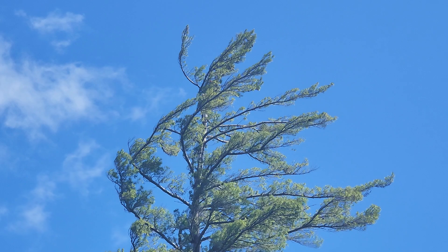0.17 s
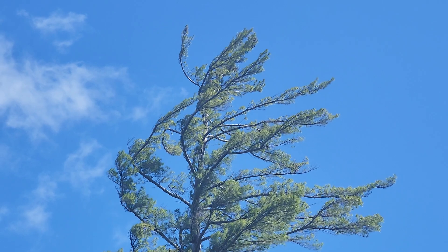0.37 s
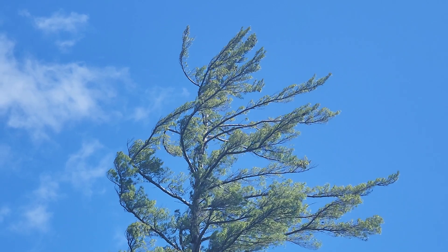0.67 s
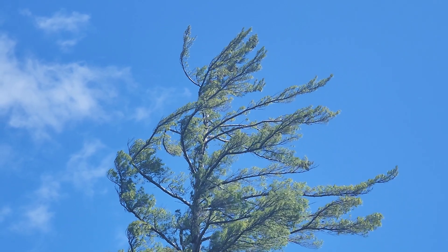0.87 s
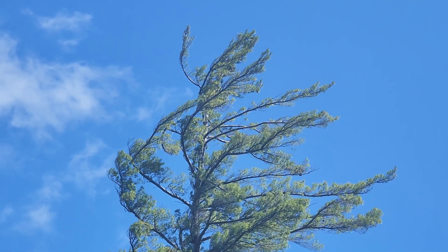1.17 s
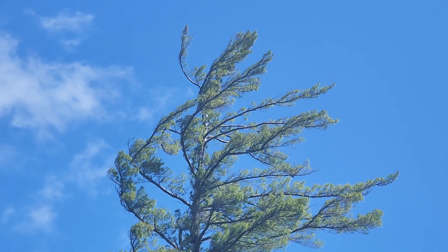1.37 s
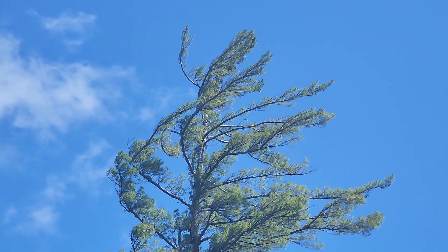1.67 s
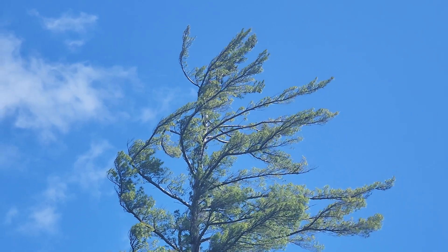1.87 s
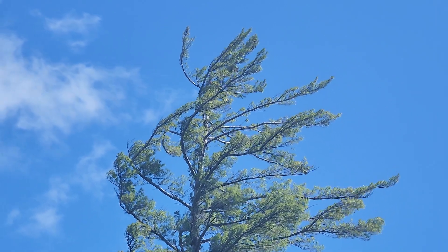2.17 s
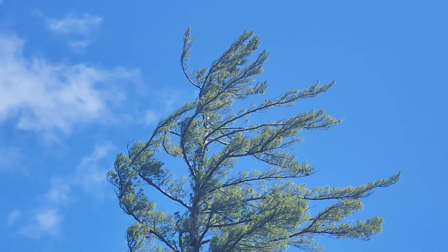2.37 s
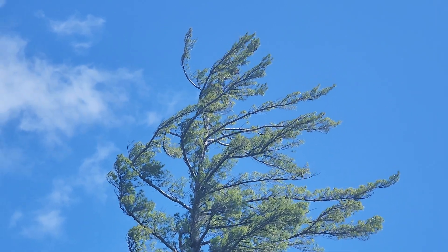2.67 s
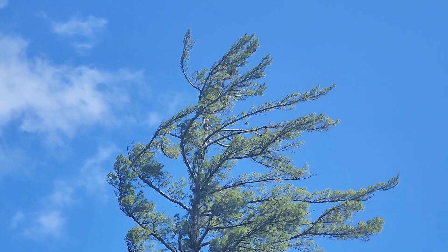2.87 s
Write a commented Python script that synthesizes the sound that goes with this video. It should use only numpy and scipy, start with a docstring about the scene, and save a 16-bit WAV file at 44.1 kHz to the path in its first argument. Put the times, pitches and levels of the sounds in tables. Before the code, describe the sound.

After a brief silence, an even, airy wind rush in pine needles starts abruptly and continues throughout; faint far-off engine drone lies beneath, and low wind buffets hit the handheld microphone late in the middle.

```python
"""Silence for a fifth of a second, then wind rushing in the needles of a tall pine, heard from below in stereo.
Rush: coloured noise in narrow bands that sway, flicker and streak. Under it, a low noise rumble and a far
engine's wavering sines with a hum. Gusts buffet the microphone ports in low noise thumps that follow a level
table; a brief treble-noise rustle comes near 2.06 s."""
import sys
import numpy as np
from scipy import signal
from scipy.fft import rfft, irfft
from scipy.io import wavfile
from scipy.ndimage import uniform_filter1d

SR = 44100
rng = np.random.default_rng(int(sys.argv[2]) if len(sys.argv) > 2 else 0)


def to_wav(s):
    """Save 16-bit WAV."""
    ch = np.atleast_2d(s).T  # columns
    pcm = np.round(np.clip(ch, -1, 1) * 32767)  # PCM
    wavfile.write(sys.argv[1], SR, pcm.astype(np.int16))


def volts_from_db(level):
    """Convert decibel levels to linear amplitude ratios."""
    exponent = np.asarray(level, float) / 20
    return 10 ** exponent


N = 133623

TIME_S = np.arange(N) / SR
BIN_HZ = np.maximum(np.fft.rfftfreq(N, 1 / SR), 1)
LEFT_RIGHT = np.array([[1], [-1]])

START_S, START_RISE_S, TOP_HZ = 0.1876, 0.015, 15720

# Needle rush, relative spectrum: (frequency [Hz], density [dB per Hz])
RUSH_COLOUR = [(150, -41), (260, -4), (330, -3), (420, -5), (516, -6.5), (603, -5), (821, -8.5),
               (1000, -6.5), (1220, -7), (1400, -1.5), (1550, -1.5), (1780, -3.5), (2070, -1.5), (2250, -5),
               (2500, -13.5), (3000, -14), (3590, -18), (5060, -27.5), (6300, -25.5), (6900, -27.5),
               (7400, -25.5), (9000, -34), (11300, -40), (13000, -39), (14700, -38), (15700, -39)]
# Gust course: (time [s], rush level [dB], treble lift [dB])
GUST = [(.2, -43.5, 0), (.4, -43, -2), (.65, -42, -0.5), (.9, -43, 0), (1.1, -42.5, 0.5), (1.3, -42, 0),
        (1.5, -42, 0), (1.7, -42.5, 0), (2.05, -42, 1.5), (2.4, -42.5, 0.5), (2.8, -42.5, 0.5),
        (3.03, -43, 0.5)]
# Rush likeness of left and right: (frequency [Hz], correlation [0-1])
RUSH_ALIKE = [(250, .85), (400, .7), (640, .25), (1000, .35), (1500, .5), (2300, .65), (3300, .4),
              (5000, 0), (15000, 0)]
# Rush balance: (frequency [Hz], left minus right [dB])
RUSH_BALANCE = [(250, 0), (700, -0.3), (1300, -1.9), (2400, 0.3), (4400, 2), (7000, -2.3), (10000, -0.5),
                (13000, 4.5), (15500, 6)]
SWAY_DB, SWAY_PER_S = 0.3, 8
FLICKER_DB, FLICKER_PER_S = 0.5, 14
STREAK_DB, STREAK_PER_S = 1.2, 16  # depth in the low bands; half in the treble
TILT_FROM_HZ, LEFT_EARLY_S = 2700, 0.00004

# Distant rumble, relative spectrum: (frequency [Hz], density [dB per Hz])
RUMBLE_COLOUR = [(20, -13), (50, 4.5), (100, 3), (170, 3), (260, -4), (400, -47), (1500, -90)]
RUMBLE_BASE_DB, RUMBLE_SWAY_DB, RUMBLE_SWAY_PER_S = -47, 1.5, 2.8
RUMBLE_SIDE_DB = -13  # side relative to mid

# Engine lines: (multiple of FIRING_HZ, base level [dB], left minus right [dB])
ENGINE_ORDERS = [(1, -50, 0), (2, -53, 0), (3, -54.5, 3)]
FIRING_HZ = 66.6
HUM_HZ, HUM_BASE_DB, HUM_BALANCE_DB = 237.6, -58, -2
PITCH_WAVER, PITCH_WAVER_PER_S = 0.00367, 2.96  # waver as a fraction of the frequency
LINE_SWELL_DB, LINE_SWELL_PER_S = 2, 8.07
# Level changes: (time [s], engine line 1 [dB], line 2 [dB], line 3 [dB], hum [dB], rumble [dB])
DRONE_CHANGES = [(.2, -3, -7, -4, 1, -10.5), (.6, 1.5, -1, -2, 4.5, 5), (.9, 4, -16, -5.5, -1.5, 0.5),
                 (1.25, -2, 2.5, 3, 6.5, 1), (1.6, -20, 4.5, -3, -5.5, 4), (2., 10, -8, -8, -2.5, -1),
                 (2.35, -12, 0.5, 2.5, -0.5, 2), (2.7, 1, 2.5, 1, -3, -1), (3.03, 0, -4.5, -5, 5.5, 4.5)]

# Buffeting course: (time [s], level before BUFFET_TRIM_DB [dB], left minus right [dB])
BUFFET = [(0.21, -49, -3), (0.32, -48.5, 11), (0.39, -46, -5), (0.41, -44, 16), (0.49, -47.5, 3.5),
          (1.11, -57, 2), (1.25, -40.5, 19), (1.3, -70, 6), (1.4, -48, 0.0), (1.44, -59, -2),
          (1.48, -61, -5), (1.62, -46.5, 11), (1.69, -47, 29), (1.74, -52, 7), (1.81, -39, 0),
          (1.85, -47, -2.5), (1.91, -29.5, -1), (1.93, -34.5, -1), (1.97, -36, -23), (2.05, -39, 3),
          (2.09, -37, -18), (2.11, -42, -15), (2.14, -27, -3.0), (2.18, -34.5, 2), (2.23, -37, -4.5),
          (2.28, -56, -13), (2.38, -43, 0), (2.64, -49, 5.5), (2.65, -47.5, 6), (2.87, -58, 0),
          (2.91, -45, 6), (3.03, -51, -8)]
# Buffeting, relative spectrum: (frequency [Hz], density [dB per Hz])
BUFFET_COLOUR = [(12, -38), (30, 0), (52, 0.5), (90, -4), (130, -12), (220, -18.5), (400, -82),
                 (1500, -100)]
BUFFET_ALIKE, BUFFET_TRIM_DB, BUFFET_FLICKER_DB = 0.45, -1.5, 2.5

# Treble bursts: (centre time [s], peak level [dB], Gaussian length [s])
RUSTLES = [(2.058, -63, .014)]
# Burst, relative spectrum: (frequency [Hz], density [dB per Hz])
RUSTLE_COLOUR = [(3000, -32), (5000, -5), (7000, 0), (10000, -12), (15000, -15)]


def column(table, k):
    """Column k of a time table, interpolated per sample."""
    table = np.array(table)
    return np.interp(TIME_S, table[:, 0], table[:, k])


def over_hz(table):
    """Frequency table, interpolated over log frequency per spectral bin."""
    table = np.array(table)
    return np.interp(np.log(BIN_HZ), np.log(table[:, 0]), table[:, 1])


def unit(x):
    """Scale to rms 1 over both channels."""
    return x / np.sqrt(np.mean(x ** 2))


def walk(rate_per_s):
    """Random levels, each held 1 / rate_per_s and smoothed twice; spread near 1."""
    hold = int(SR / rate_per_s)
    steps = np.repeat(rng.standard_normal(N // hold + 1), hold)
    smooth = uniform_filter1d(uniform_filter1d(steps, hold), hold)
    return 1.38 * smooth[:N]


def pair(colour, alike):
    """Left and right noise spectra of one colour; the mid/side mix sets their correlation."""
    mid, side = rfft(rng.standard_normal((2, N)))
    alike = np.clip(alike, -0.98, 0.98)
    left_right = np.sqrt(1 + alike) * mid + LEFT_RIGHT * np.sqrt(1 - alike) * side
    return volts_from_db(over_hz(colour)) * left_right


def sides(balance_db):
    """Left and right gains from left minus right in dB."""
    return volts_from_db(LEFT_RIGHT * balance_db / 2)


def needles():
    """Needle rush: noise bands sway together, flicker by the half octave, streak singly; the gust sets level and treble."""
    low_cut = np.clip(BIN_HZ / 250, 0, 1) ** 4
    spectrum = pair(RUSH_COLOUR, over_hz(RUSH_ALIKE)) * sides(over_hz(RUSH_BALANCE)) * low_cut
    spectrum = spectrum * np.exp(1j * np.pi * BIN_HZ * LEFT_EARLY_S * LEFT_RIGHT)
    sway_db = SWAY_DB * walk(SWAY_PER_S)
    treble_db = column(GUST, 2)
    rush = 0
    for k, centre_hz in enumerate(177 * 2 ** (np.arange(40) / 6)):
        if k % 3 == 0:  # new flicker every half octave
            flicker_db = FLICKER_DB * walk(FLICKER_PER_S)
        window = np.clip(1 - 6 * np.abs(np.log2(BIN_HZ / centre_hz)), 0, 1)
        band = irfft(spectrum * window, N)
        tilt = np.clip(np.log2(2 * centre_hz / TILT_FROM_HZ), 0, 1)
        streak_db = STREAK_DB * (1 - tilt / 2) * walk(STREAK_PER_S)
        rush = rush + band * volts_from_db(sway_db + flicker_db + streak_db + treble_db * tilt)
    return unit(rush) * volts_from_db(column(GUST, 1))


def rumble():
    """Distant rumble: low noise with a weak side signal, so nearly alike left and right."""
    side_share = volts_from_db(2 * RUMBLE_SIDE_DB)  # power ratio
    noise = unit(irfft(pair(RUMBLE_COLOUR, (1 - side_share) / (1 + side_share)), N))
    sway_db = RUMBLE_SWAY_DB * walk(RUMBLE_SWAY_PER_S)
    return noise * volts_from_db(RUMBLE_BASE_DB + column(DRONE_CHANGES, 5) + sway_db)


def engine_and_hum():
    """Far engine: sines at multiples of the firing rate, plus a hum; all share one pitch waver, each swells alone."""
    warped_s = np.cumsum(1 + PITCH_WAVER * walk(PITCH_WAVER_PER_S)) / SR
    lines = [(k * FIRING_HZ, db, balance_db) for k, db, balance_db in ENGINE_ORDERS]
    lines.append((HUM_HZ, HUM_BASE_DB, HUM_BALANCE_DB))
    drone = 0
    for k, (hz, base_db, balance_db) in enumerate(lines, start=1):
        level_db = base_db + column(DRONE_CHANGES, k) + LINE_SWELL_DB * walk(LINE_SWELL_PER_S)
        sine = np.sqrt(2) * np.sin(2 * np.pi * (hz * warped_s + rng.random()))  # rms 1
        drone = drone + sine * volts_from_db(level_db) * sides(balance_db)
    return drone


def buffeting():
    """Turbulence at the two microphone ports: low noise thumps, each side flickering on its own."""
    noise = unit(irfft(pair(BUFFET_COLOUR, BUFFET_ALIKE), N))
    flicker_db = BUFFET_FLICKER_DB * np.array([walk(21.67), walk(21.92)])
    level_db = column(BUFFET, 1) + BUFFET_TRIM_DB + flicker_db
    return noise * volts_from_db(level_db) * sides(column(BUFFET, 2))


def rustle():
    """Soft treble rustle: noise independent left and right under Gaussian envelopes."""
    envelope = 0
    for centre_s, peak_db, length_s in RUSTLES:
        envelope = envelope + volts_from_db(peak_db) * np.exp(-((TIME_S - centre_s) / length_s) ** 2)
    return unit(irfft(pair(RUSTLE_COLOUR, 0), N)) * envelope


def scene():
    """Sum of all sources."""
    return needles() + rumble() + engine_and_hum() + buffeting() + rustle()


def top_cut(x):
    """Nothing passes above the cut-off."""
    return signal.sosfilt(signal.butter(12, 16190, fs=SR, output="sos"), x)


def record(dry):
    """Quick switch-on, then a steep low-pass."""
    switch_on = np.clip((TIME_S - START_S) / START_RISE_S, 0, 1) ** 3
    low_pass = signal.ellip(12, 0.3, 60, TOP_HZ, fs=SR, output="sos")
    mix = signal.sosfilt(low_pass, dry * switch_on)
    return top_cut(mix)


dry = scene()
out = record(dry)
to_wav(out)
```